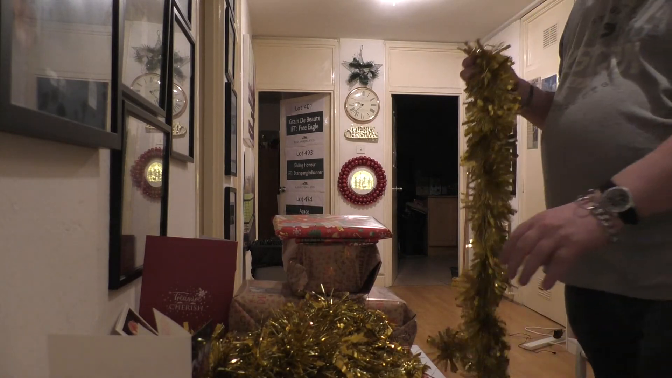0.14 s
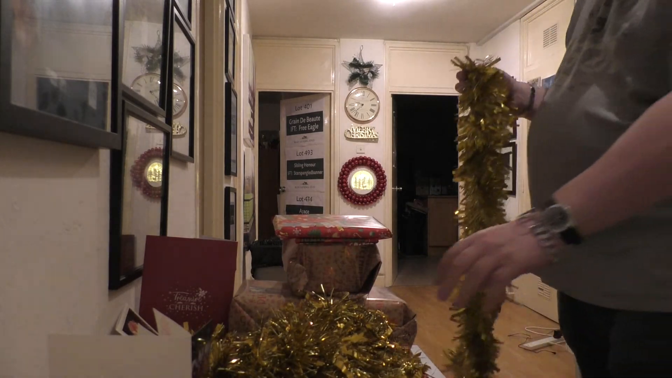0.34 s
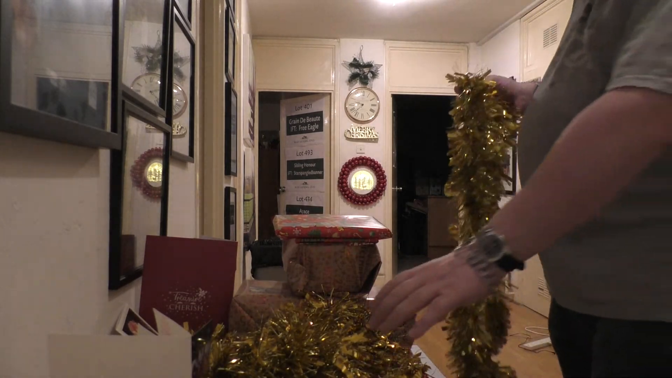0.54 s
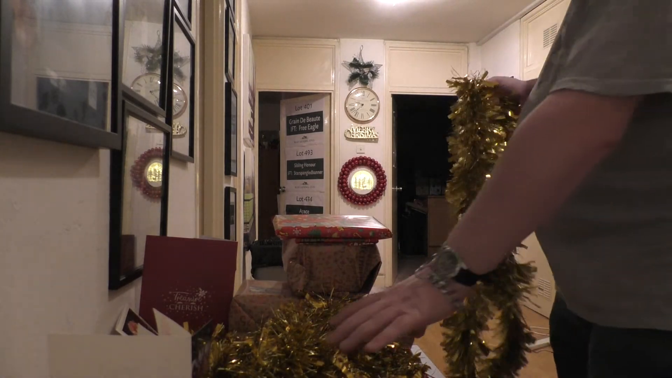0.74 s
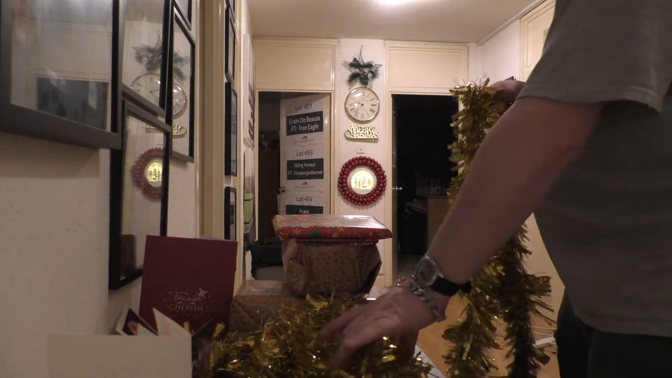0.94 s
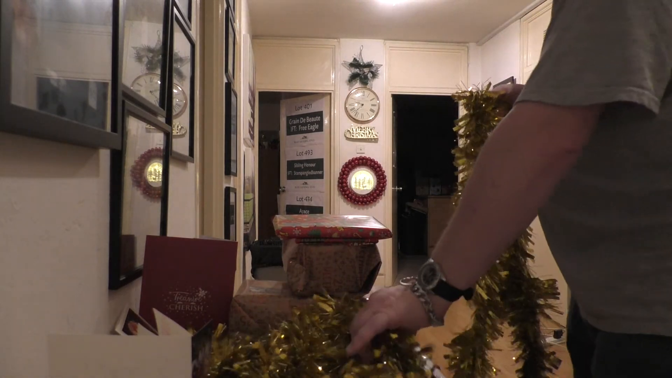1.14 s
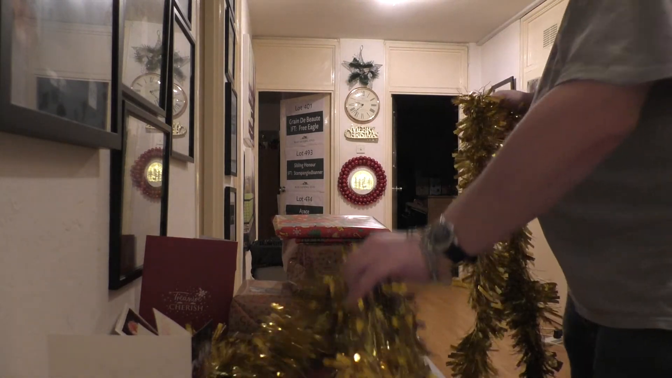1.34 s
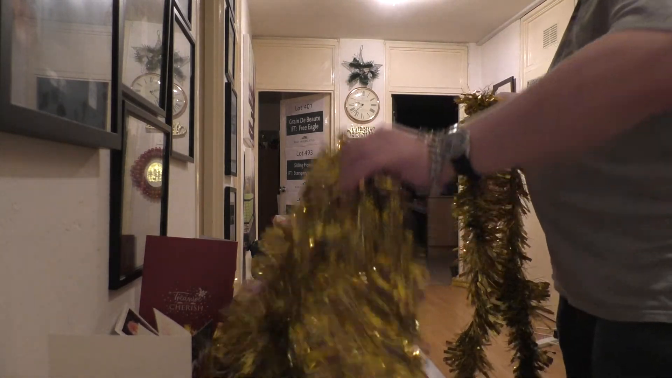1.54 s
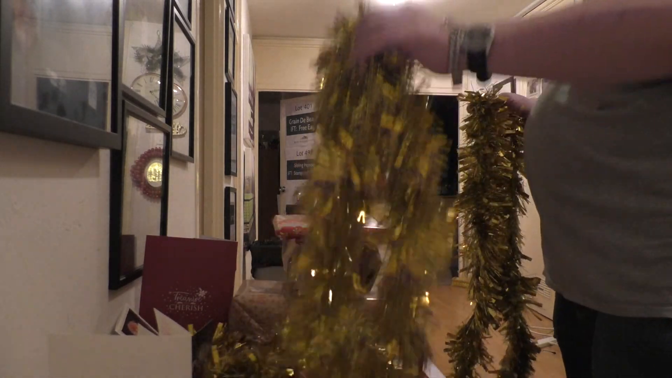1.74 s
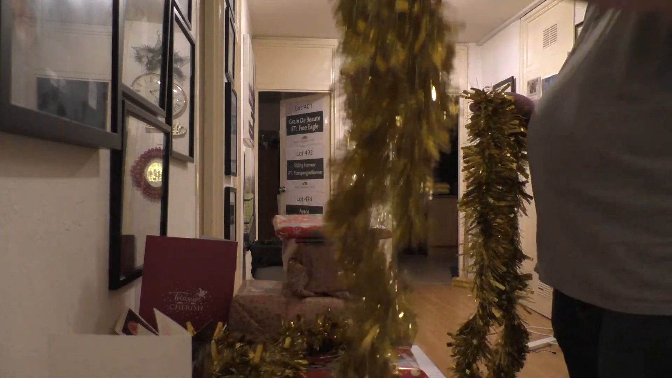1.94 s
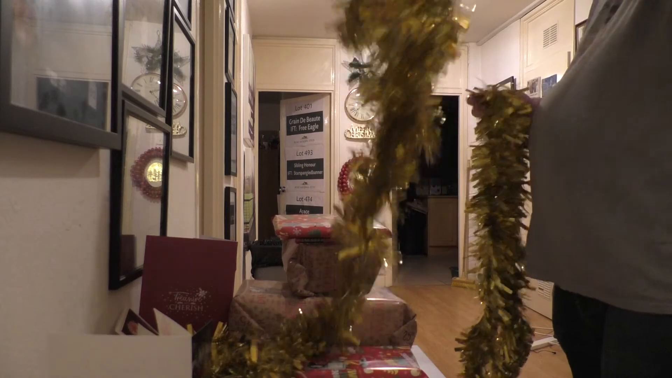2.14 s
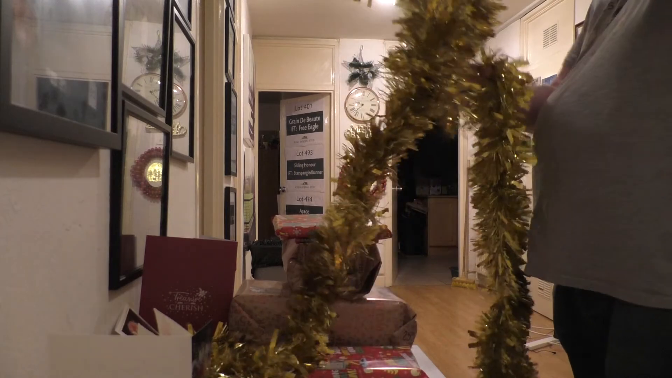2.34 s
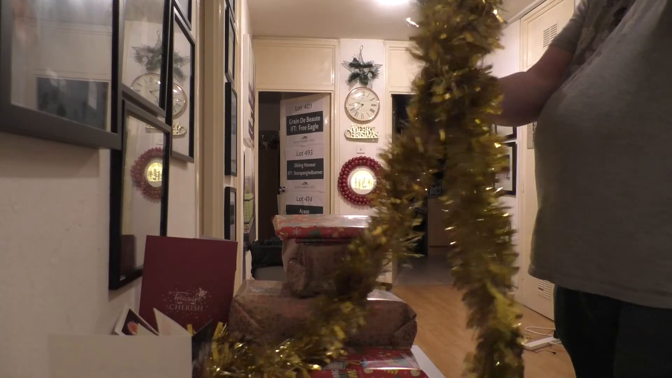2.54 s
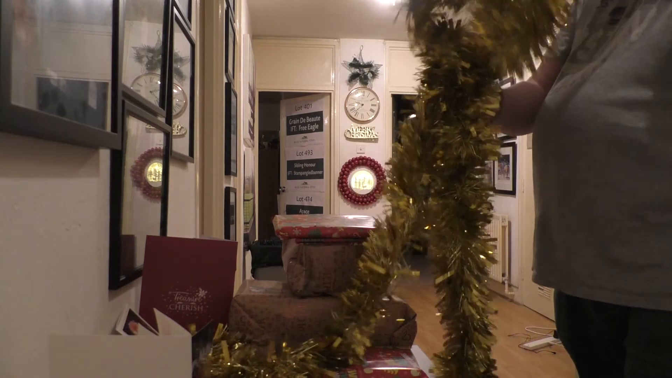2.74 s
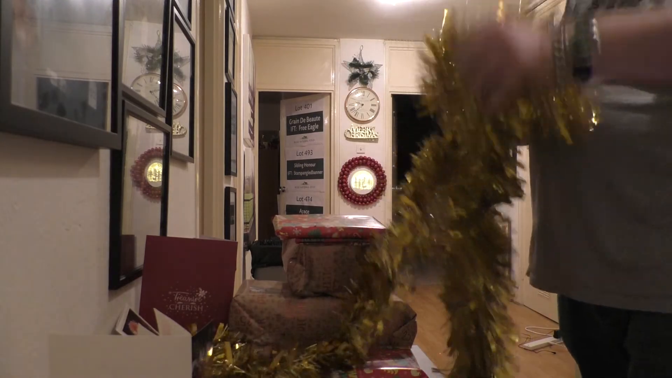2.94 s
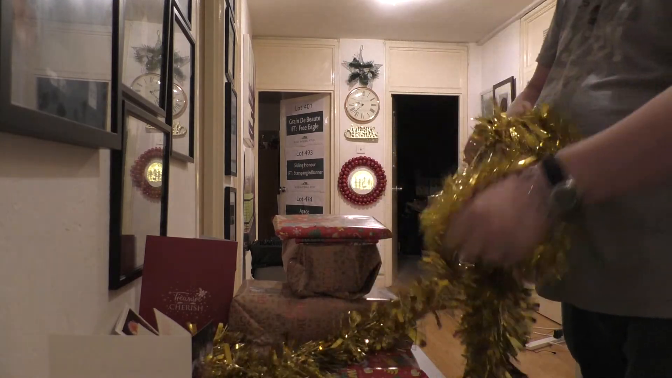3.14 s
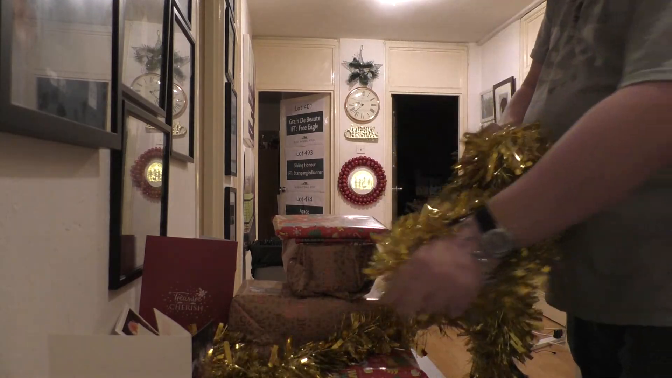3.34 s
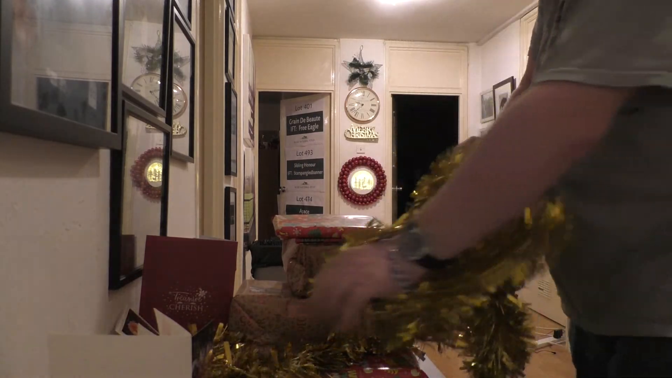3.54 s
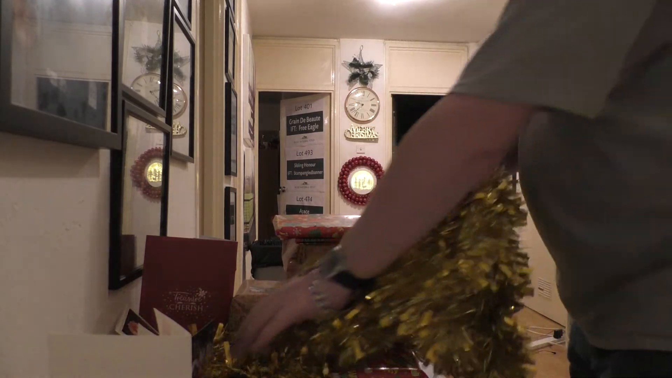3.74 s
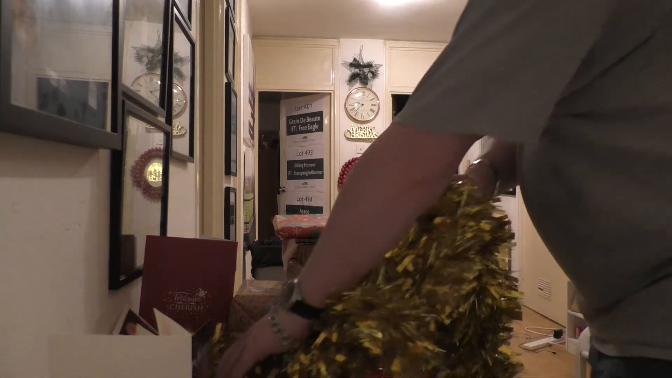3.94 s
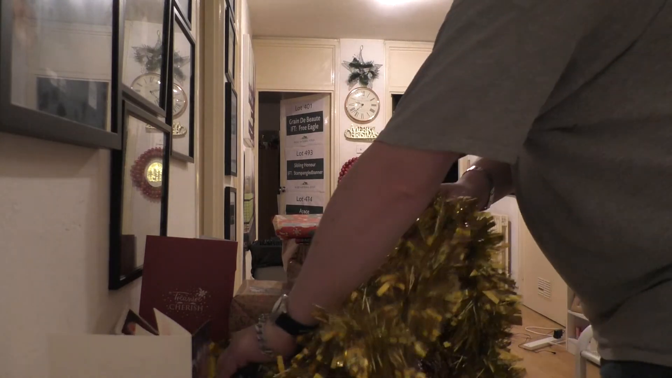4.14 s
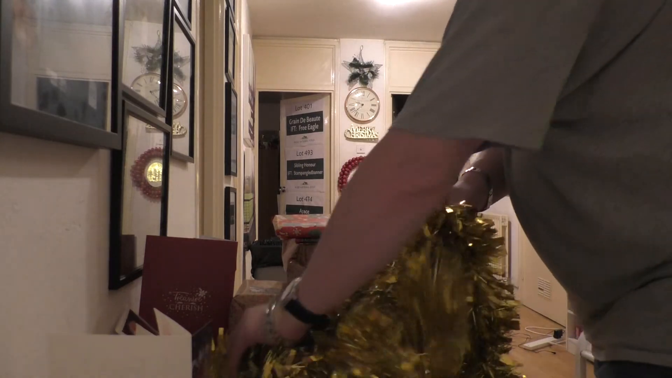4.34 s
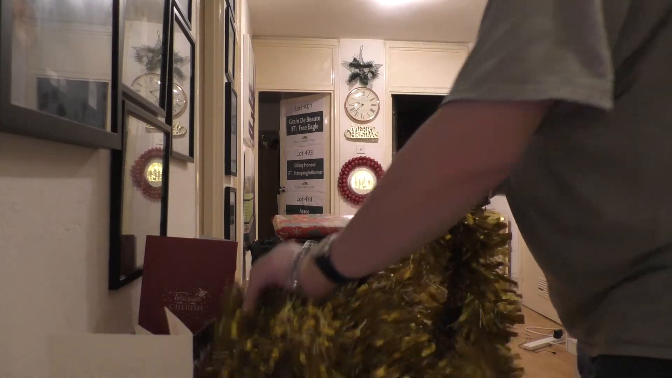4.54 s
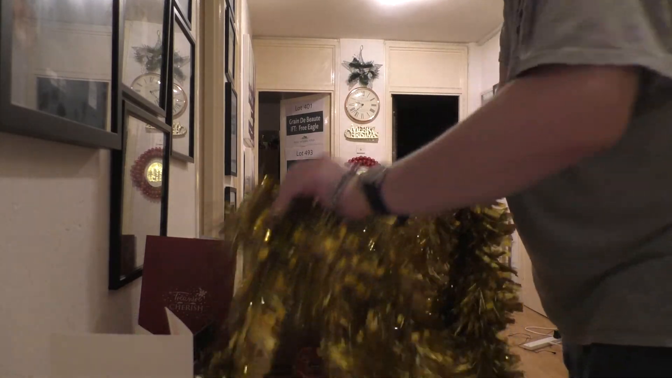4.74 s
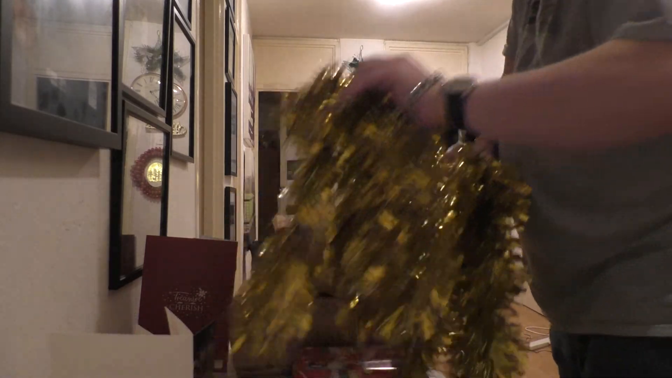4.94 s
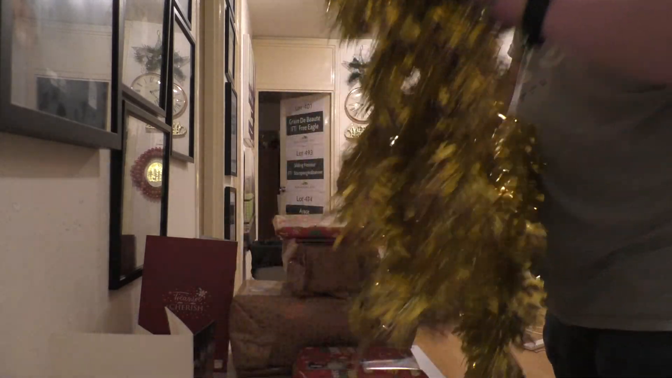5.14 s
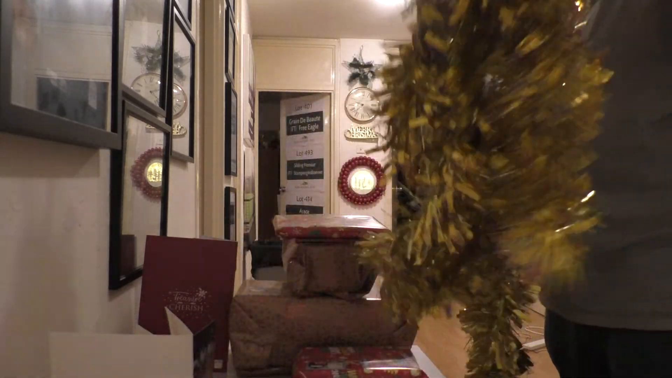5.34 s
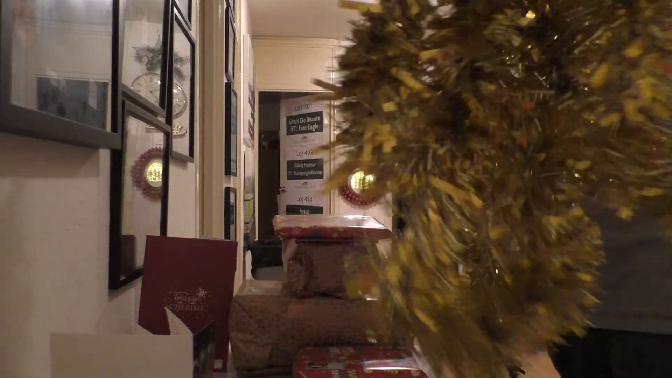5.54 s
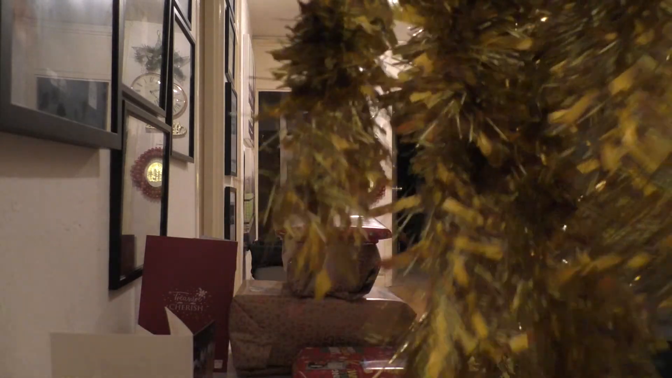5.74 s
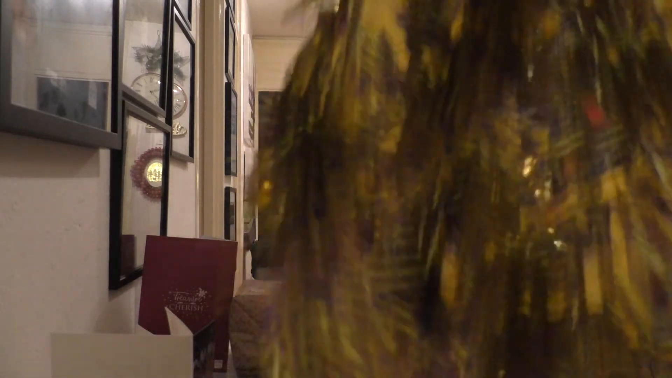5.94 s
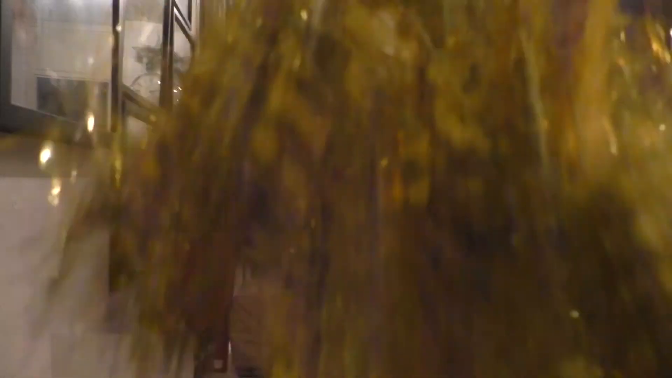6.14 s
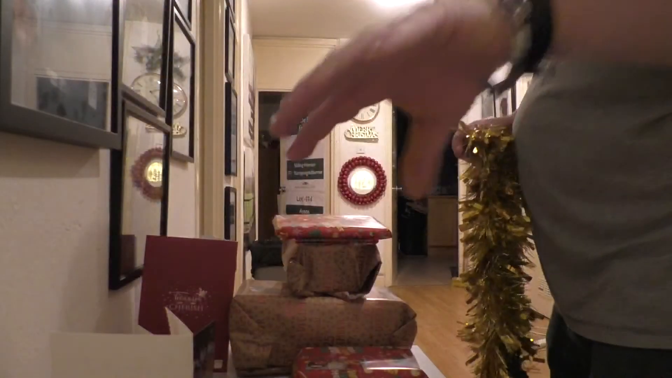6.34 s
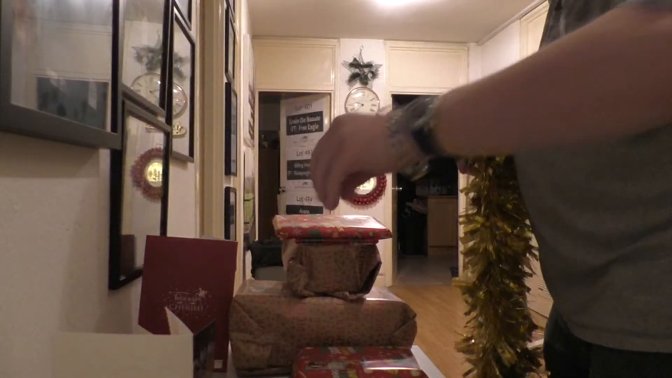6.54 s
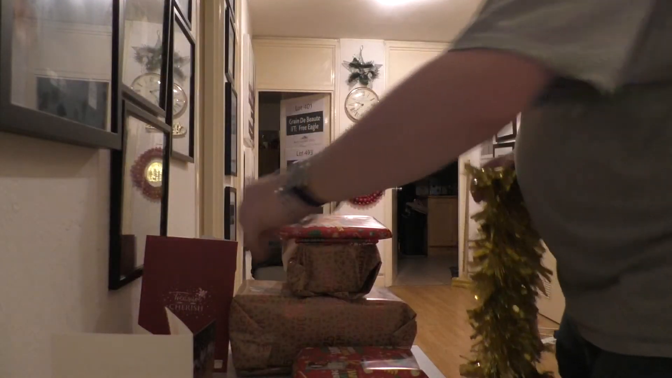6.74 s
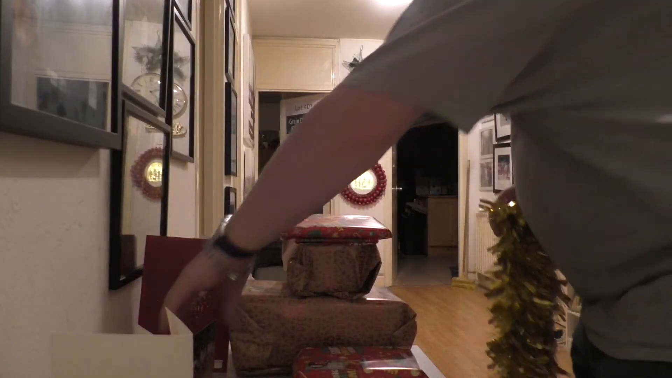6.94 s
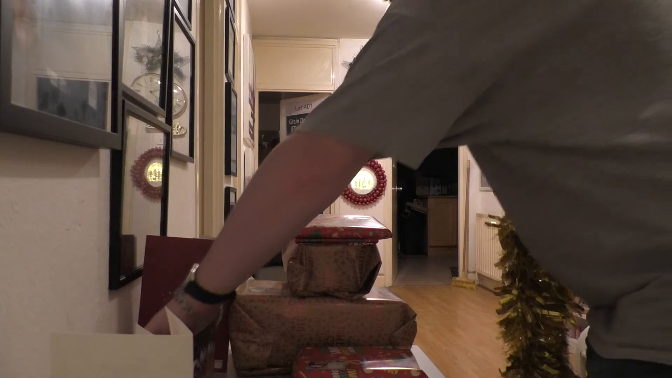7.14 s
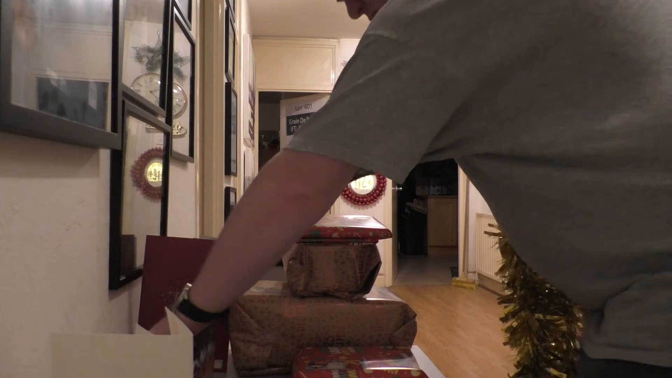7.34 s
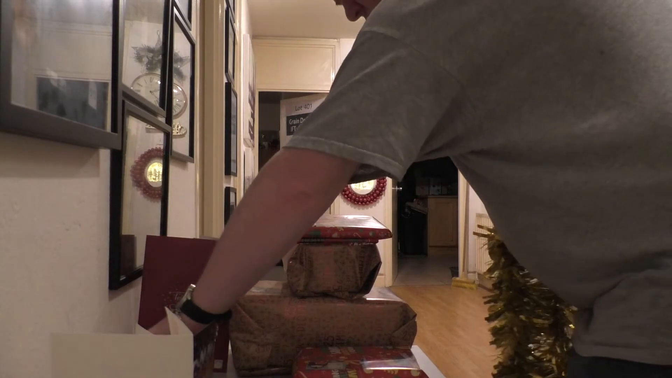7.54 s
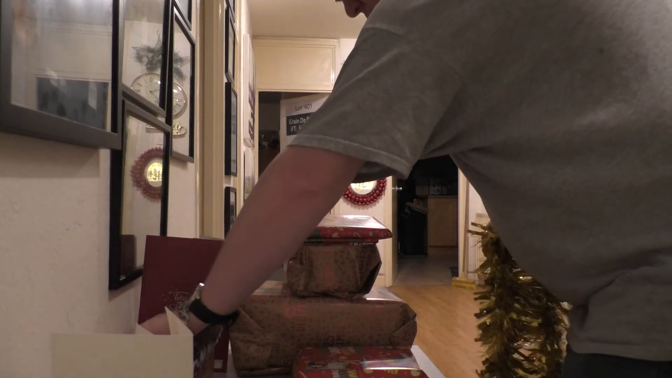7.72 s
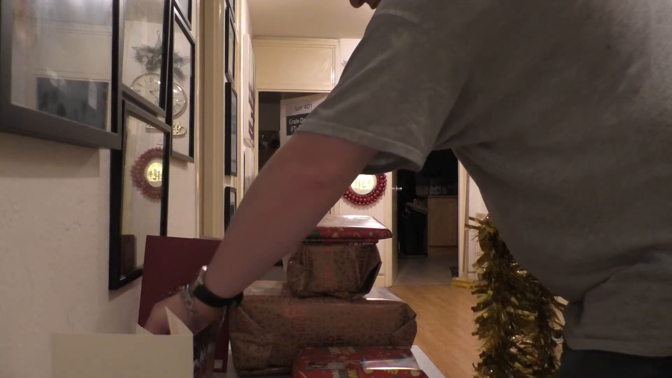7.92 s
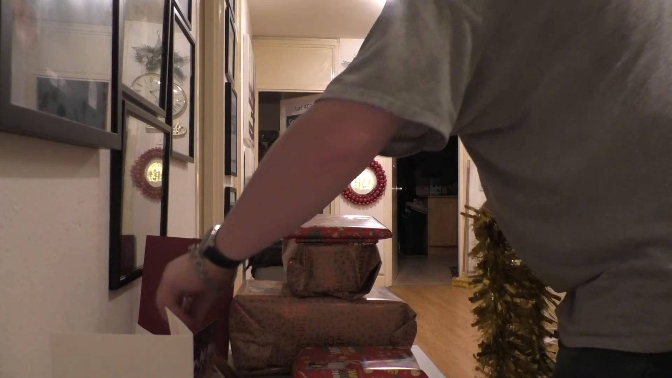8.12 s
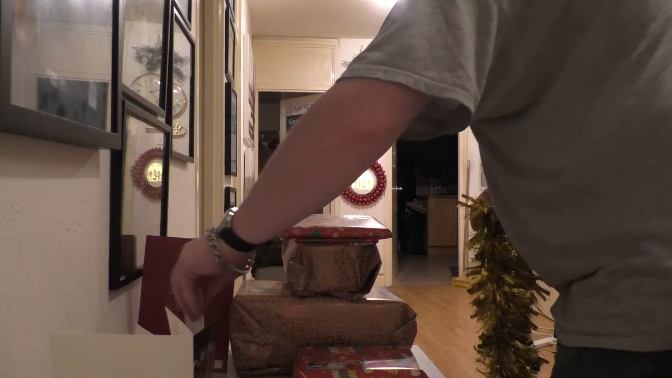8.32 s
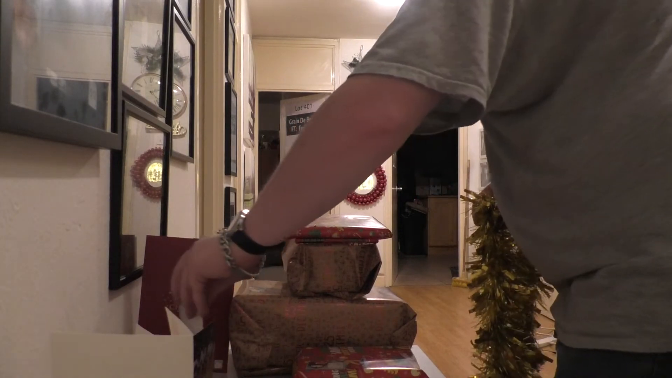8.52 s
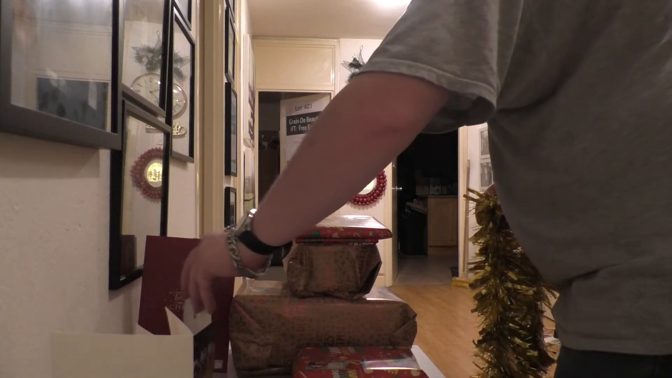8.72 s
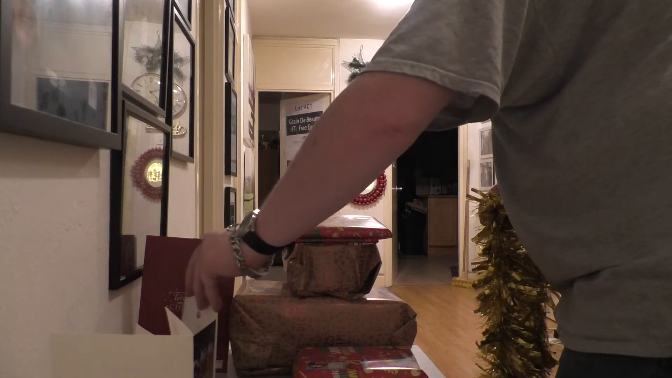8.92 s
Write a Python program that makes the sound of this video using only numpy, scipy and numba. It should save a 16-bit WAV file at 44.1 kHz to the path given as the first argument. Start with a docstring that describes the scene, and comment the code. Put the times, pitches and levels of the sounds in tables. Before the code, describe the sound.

Thin metallic tinsel crinkles beside a small stereo microphone indoors, first lightly, then more thickly as it is gathered and dragged over cardboard. Hollow box knocks and sharp foil snaps punctuate it, along with tiny high bracelet clinks. After a brief lull, one very close, harsh rush of crackling peaks and stops abruptly. Quiet fumbling and a cluster of soft knocks follow, with a short hall tail and low mains hum.

```python
"""A hallway at home: foil tinsel is lifted, gathered and dropped close to a small stereo microphone.
Showers of tiny contacts, filtered bright, make the ticking strips; darker grains scrape and rumble over
cardboard and wrapped boxes. Struck modes make a metal bracelet chink, the box knock under a hand and
creases snap, with a short hall tail. Mains hum and room air lie underneath."""
import sys
import numpy as np
from scipy import signal
from scipy.fft import rfft, irfft, next_fast_len
from scipy.io import wavfile
from scipy.ndimage import uniform_filter1d
from numba import njit

SR = 44100
rng = np.random.default_rng(int(sys.argv[2]) if len(sys.argv) > 2 else 0)


def master_out(mix):
    """Clip the mix to full scale and print it as 16-bit PCM to the path in sys.argv[1]."""
    frames = np.transpose(np.atleast_2d(mix))
    ceiling = np.clip(frames, -1, 1)
    pcm = np.round(ceiling * 32767).astype(np.int16)
    wavfile.write(sys.argv[1], SR, pcm)


N = 396018

# tone of the foil strips: f/Hz, level per Hz/dB
FOIL_TONE = [(1500, -41), (2500, -3.5), (4000, -3), (6000, -1.5), (8500, -2), (12000, -7.5), (16000, -18)]
# how hard the garland is moved, one curve per spell of handling: t/s, level of the foil strips/dB
HANDLING = [
    [(0.0, -55.5), (0.366, -61), (0.418, -52.5), (0.522, -52.5), (0.6, -61), (0.792, -65.5), (0.85, -62)],
    [(0.85, -63), (0.906, -63), (0.924, -56.5), (1.178, -44.5), (1.232, -52.5), (1.42, -45), (1.5, -47)],
    [(1.5, -47.5), (1.688, -43.5), (1.748, -48.5), (1.814, -56.5), (2.018, -65.5), (2.276, -53.5),
     (2.4, -59)],
    [(2.4, -56.5), (2.58, -46.5), (2.726, -53), (3.376, -51), (3.396, -52.5), (3.748, -53), (3.85, -53)],
    [(3.85, -55), (3.994, -50), (4.116, -51), (4.182, -44.5), (4.28, -49), (4.434, -46.5), (4.45, -48)],
    [(4.45, -46), (4.698, -46), (4.708, -43.5), (4.734, -48.5), (4.862, -51), (4.902, -47), (4.98, -50)],
    [(5.02, -45.5), (5.034, -50), (5.262, -51), (5.268, -48.5), (5.394, -52.5), (5.49, -62.5), (5.97, -60)],
    [(5.97, -60), (6.014, -48.5), (6.08, -47.5), (6.104, -43), (6.3, -36.5)],
    [(6.3, -35), (6.316, -30.5), (6.322, -33), (6.636, -61), (6.862, -61.5), (6.9, -63.5)],
    [(7.4, -65.5), (7.484, -68), (7.528, -64), (7.618, -71), (7.67, -64), (7.814, -51.5), (8.0, -69)],
    [(8.0, -72), (8.092, -61), (8.222, -51), (8.338, -75), (8.906, -86), (8.924, -54), (8.98, -80)],
]
# side level for all layers but the hum, with a gap near 7 kHz, before any trim: f/Hz, side re mid/dB
SIDE_LEVEL = [(60, -6), (110, -6.5), (200, -5.5), (500, -7), (1000, -7), (2400, -7), (4000, -6), (5500, -6),
              (7000, -48), (8500, -12), (11000, -8.5), (15000, -6.5)]


def undb(db):
    """Level in dB to amplitude."""
    return 10 ** (np.asarray(db) / 20)


def colour(x, table, sign=1):
    """Equalise by a table of f/Hz and level/dB, joined on a log frequency axis; sign scales the dB."""
    hz, db = np.transpose(table)
    size = next_fast_len(N)
    bin_hz = np.maximum(np.arange(size // 2 + 1) * SR / size, 1)
    gain = undb(sign * np.interp(np.log(bin_hz), np.log(hz), db))
    return irfft(rfft(x, size) * gain, size)[..., :N]


def unit(x, lo_hz, hi_hz):
    """Scale all channels so that the band lo-hi of the first has rms 1."""
    sos = signal.butter(4, [lo_hz, hi_hz], "band", fs=SR, output="sos")
    band = signal.sosfilt(sos, x)
    return x / np.sqrt(np.mean(band[0] ** 2))


def walk(rate):
    """Random drift: new values 'rate' times a second, joined and smoothed."""
    knots = rng.standard_normal(size=N // 256)
    joined = np.interp(np.arange(N) * rate / SR, np.arange(len(knots)), knots)
    return uniform_filter1d(joined, int(SR / rate / 2))


def curve(table):
    """Columns of a time table, one value per sample."""
    s, *columns = np.vstack(table).T
    return [np.interp(np.arange(N) / SR, s, column) for column in columns]


def grains(rate, spread_db, patchy_db, patch_rate):
    """Mid and side of a shower of tiny contacts; a few are much bigger, and they come in patches."""
    hit = rng.random((2, N)) < rate / SR
    size = undb(spread_db * rng.exponential(size=(2, N))) * rng.standard_normal((2, N))
    return hit * size * undb(patchy_db * walk(patch_rate))


def ring(push, hz, t60):
    """One decaying mode with a unit answer to a unit push."""
    r = np.exp(-np.log(1000) / (t60 * SR))
    w = 2 * np.pi * hz / SR
    return signal.lfilter([0, np.sin(w)], [1, -2 * r * np.cos(w), r * r], push)


def strike(times, db, modes, scatter_db):
    """Blows ring modes (f/Hz, t60/s) at db[blow, mode]; shares and signs are drawn at random for each blow."""
    luck = rng.standard_normal((len(times), len(modes), 2))
    gain = undb(db + scatter_db * luck[..., 0]) * np.sign(luck[..., 1])
    push = np.zeros((len(modes), N))
    push[:, (times * SR).astype(int)] = gain.T
    return sum(ring(p, *mode) for p, mode in zip(push, modes))


def background():
    """Room air and microphone hiss as coloured noise, and a hum at twice the mains rate."""
    # tone of air and hiss: f/Hz, level per Hz/dB
    air_tone = [(22, -11), (31, 0.5), (42, -6), (80, -6.5), (125, -4.5), (300, -6), (420, -13), (630, -22),
                (1200, -12), (2000, -15), (4800, -22.5), (12500, -23), (16000, -28)]
    air_db, hum_hz, hum_db = -56, 100.6, -59
    noise = unit(colour(rng.standard_normal((2, N)), air_tone), 120, 16000)
    mid, side = noise * undb(air_db + 0.6 * walk(2.4))
    hum_level = np.sqrt(2) * undb(hum_db + 2.1 * walk(7.6))
    hum_phase = 2 * np.pi * hum_hz * np.arange(N) / SR + 0.39 * walk(3.35)
    hum = hum_level * np.sin(hum_phase)
    return np.array([mid + hum, colour(side, SIDE_LEVEL) + undb(-23.5) * hum])


@njit
def hollow(x, hz, width):
    """Band-pass whose centre moves: a state-variable resonator, width in Hz."""
    y, band, low = np.empty(len(x)), 0., 0.
    for i in range(len(x)):
        g, k = np.tan(np.pi * hz[i] / SR), width / hz[i]
        v = (band + g * (x[i] - low)) / (1 + g * (g + k))
        band, low, y[i] = 2 * v - band, low + 2 * g * v, k * v
    return y


def flutter(lo_hz, hi_hz, t60, swell_db, count):
    """Creases of many sizes ring briefly at their own pitches, each coming and going."""
    pitches = np.geomspace(lo_hz, hi_hz, count) * (1 + 0.036 * rng.standard_normal(count))
    return sum(ring(grains(900, 1.15, swell_db, 9), hz, t60) for hz in pitches)


def tinsel():
    """Strips tick in the treble, the bunch scrapes in the middle and shakes the box below."""
    # tones of the thinnest strips, the scraping and the box rumble: f/Hz, level per Hz/dB
    thin_tone = [(6000, -23), (8000, -5.5), (11000, -2), (15000, -6.5), (16000, -10)]
    scrape_tone = [(500, -16), (900, -9), (1400, -4.5), (1900, -2.5), (2600, -5.5), (3600, -3.5),
                   (5000, -9.5), (7000, -35)]
    rumble_tone = [(80, -43.5), (115, 1), (140, -1), (260, -2.5), (420, -3.5), (600, -12.5), (900, -25.5),
                   (1500, -27)]
    # held in the air the thinnest strips stand out, dragged over the boxes the bunch scrapes and rumbles:
    # t/s, then re foil strips: thinnest strips/dB, scraping before hollow and creases/dB, box rumble/dB
    contact = [(0, 0.5, -3.5, -15), (.35, 1, -0.5, -9), (.56, -9, -0.5, -2.5), (.8, 1, 6, -6),
               (1.0, 1, 1.5, -2), (1.45, -1.5, -1.5, -9), (1.7, 0.5, 0.5, -6.5), (2.2, 4, 2.5, -6.5),
               (2.6, 1.5, -2.5, -13), (3.5, 1.5, -1, -10), (4.1, 1, 1.5, -4), (4.25, -0.5, 4.5, -4.5),
               (4.4, 1, -3.5, -6.5), (4.58, 0.5, 2, 4), (4.68, -0.5, -1.5, -10), (4.74, -1.5, 3, 8),
               (4.86, 1, 2, -7.5), (5.1, 0.5, -2.5, -6), (5.45, 5, -3.5, -13), (5.95, -0.5, 0, -14),
               (6.2, 5, 4.5, -7), (6.35, -1.5, -1, -11.5), (6.8, 3, 5.5, 0.5), (7.45, -5, 8, 7),
               (7.75, -1, -1.5, -3.5), (8.05, -20, 8.5, 3), (8.25, -3, 6.5, -10), (8.6, -8, 3, 14),
               (8.98, -9, 5.5, 5)]
    (foil_db,) = curve(HANDLING)
    thin_db, scrape_db, rumble_db = curve(contact)

    foil = unit(colour(grains(12000, 0.33, 1.0, 30), FOIL_TONE), 4540, 6990)
    thin = unit(colour(grains(12000, 0.92, 1.0, 30), thin_tone), 9100, 11620)
    rub = unit(colour(grains(5000, 0.61, 2.0, 25), scrape_tone), 760, 5900)

    # the air pocket under the bunch: centre wanders, level flickers re scraping
    hollow_hz = 2260 * (1 + 0.12 * walk(5))
    hollow_db = -11 + 3.5 * walk(8)
    pocket = np.array([hollow(channel, hollow_hz, 260.0) for channel in rub])
    creases = unit(flutter(1273, 4237, 0.022, 2.9, count=10), 930, 4760)
    scrape = rub + undb(hollow_db) * unit(pocket, 1200, 3900) + undb(-3.5) * creases

    rumble = unit(colour(grains(1200, 1.2, 3.5, 16), rumble_tone), 90, 910)
    bunch = foil + undb(thin_db) * thin + undb(scrape_db) * scrape + undb(rumble_db) * rumble
    mid, side = undb(foil_db) * bunch
    return np.array([mid, colour(side, SIDE_LEVEL)])


def box():
    """A blow rings modes near its thud and wall pitches and booms in the surface; moving foil crackles."""
    # knocks, before the mode levels:
    # t/s, thud/dB, thud centre f/Hz, wall re thud/dB, wall centre f/Hz, boom re thud/dB
    knock_table = [(0.387, -50, 218, -12, 1820, -10), (0.738, -52.5, 365, -9, 1730, -20),
                   (1.136, -41, 300, -14, 2400, -12), (1.15, -42, 260, -14, 2000, -7),
                   (1.644, -41, 234, -7.5, 1850, -25), (1.673, -42.5, 203, -7, 3100, 5),
                   (3.518, -51, 396, -5, 3070, -11), (3.893, -47.5, 318, -9, 1370, -13),
                   (3.935, -46.5, 350, -21, 2480, -15), (4.152, -42, 283, 1.5, 1510, -16),
                   (4.159, -38, 290, 3.5, 1710, -18), (4.181, -43, 280, 3, 1540, -5),
                   (4.599, -44, 358, -2, 2440, -6), (4.702, -32.5, 360, -12, 2970, -17),
                   (4.718, -37.5, 248, -16, 1390, -3), (6.004, -47.5, 302, -1, 1800, -15),
                   (6.107, -43, 332, -5, 1690, -10), (6.245, -41.5, 266, -8, 2920, -23),
                   (6.82, -56.5, 293, -2, 982, -8), (7.382, -56, 415, -15, 2330, -14),
                   (7.802, -43, 296, -5.5, 2380, -12), (8.342, -37.5, 264, -8.5, 1110, -23),
                   (8.353, -38, 270, -14, 1110, -10), (8.384, -48, 304, -9, 1200, -2),
                   (8.439, -44, 278, -11, 1170, -17), (8.465, -42.5, 266, -8, 1130, -8),
                   (8.489, -47.5, 221, -7, 961, -8), (8.92, -50.5, 277, -12, 2090, -10)]
    # modes of the cardboard box: f/Hz, level/dB, t60/s
    box_modes = [(196, -2.5, 0.13), (273, 0, 0.15), (328, -2.5, 0.097), (407, -8.5, 0.053),
                 (426.5, -1.5, 0.15), (485, 0, 0.11), (543, -1, 0.06), (638, 2.5, 0.044), (731, 3, 0.089),
                 (895, 2, 0.065), (990, 4.5, 0.085), (1110, -0.5, 0.091), (1173, 6.5, 0.073),
                 (1270, 1, 0.046), (1425, 4, 0.036), (1563, 6, 0.078), (1650, 2, 0.11), (1800, 0, 0.081),
                 (1920, 0, 0.047), (2060, 0, 0.042), (2300, 6, 0.035), (2480, 5, 0.076), (2790, 1, 0.055),
                 (2800, 4, 0.042), (3100, 2, 0.066), (3200, 11, 0.043), (3620, -3, .04)]
    # modes of the surface under the box: f/Hz, t60/s
    surface_modes = [(132, 0.79), (165, 0.52)]
    jolt_db, jolt_s = 1.5, 0.012  # flare of the foil re foil strips, decay time constant

    s, db, thud_hz, wall_db, wall_hz, boom_db = np.transpose(knock_table)[..., None]
    times = s[:, 0]
    modes = np.array(box_modes)
    octave = np.log2(modes[:, 0])
    # modes drop off with the square of their distance in octaves
    thud = undb(db - 9.6 * (octave - np.log2(thud_hz)) ** 2)
    wall = undb(db + wall_db - 10.0 * (octave - np.log2(wall_hz)) ** 2)
    mode_db = 20 * np.log10(thud + wall) + modes[:, 1]
    knock = strike(times, mode_db, modes[:, ::2], 0.81)
    knock = knock + strike(times, db + boom_db - [0, 4], surface_modes, 1.4)
    # high-pass: little deep bass in the knocks
    knock = signal.sosfilt(signal.butter(4, 105, "high", fs=SR, output="sos"), knock)

    t = np.arange(N) / SR
    jolt = sum(np.exp(-np.maximum(t - t0, 0) / jolt_s) * (t > t0) for t0 in times)
    crackle = unit(colour(rng.standard_normal((1, N)), FOIL_TONE), 3950, 8000)[0]
    return knock + jolt * undb(curve(HANDLING)[0] + jolt_db) * crackle


def snaps():
    """A crease pops: a short ring at its own pitch and an equally strong bright tick."""
    # single foil snaps: t/s, level of ring and of tick/dB, pitch f/Hz
    snap_table = [(1.0864, -35, 2060), (1.4094, -33, 1890), (1.5064, -37.5, 2750), (2.5088, -37.5, 1635),
                  (4.6094, -36.5, 2240), (4.7015, -25.5, 3000), (4.807, -33.5, 1540), (4.9406, -37, 1370),
                  (4.9604, -32, 1910), (4.9907, -27.5, 1450), (5.995, -37, 1500), (6.028, -32, 1800),
                  (6.0695, -34, 1380), (6.099, -26, 1790), (6.133, -25, 2030), (6.168, -19.5, 1800),
                  (6.1983, -23, 2650), (6.271, -22.5, 1930), (6.3129, -20.5, 2630), (6.3452, -33, 3100),
                  (6.374, -25, 2400), (7.66, -47, 3070), (7.802, -32, 2230), (8.216, -34, 1680),
                  (8.76, -46.5, 2170)]
    out = np.zeros(N)
    push = np.arange(SR // 20) == 0
    for s, db, hz in snap_table:
        pop = ring(push, hz, 0.029) + ring(push, 5500, 0.0019)
        out[int(s * SR):][:len(push)] += undb(db) * pop
    return out


def bracelet():
    """Small links strike each other and ring; each contact favours other links."""
    # chinks: t/s, main link/dB, then re main: low link/dB, middle link/dB, top link/dB, tick/dB
    chink_table = [(2.928, -22.5, -18, -11, -22, 1), (2.938, -25, -16, -12, -22, -14),
                   (2.944, -28, -6, -5, -22, -14), (2.952, -26, -7, -7, -20, -14),
                   (5.269, -39, -8, -10, 0, 24), (5.275, -25, -13, -14, -18, -14),
                   (5.279, -21, -19, -18, -18, -10), (5.312, -37, 6, -4, -10, 4),
                   (5.319, -22.5, -12, -13, -7, 10), (5.327, -42, 5, -12, 3, -10),
                   (5.3518, -25.5, -16, -19, -16, -6), (5.374, -30, -9, -16, -16, -3),
                   (5.382, -15.5, -9, -20, -22, -12), (5.397, -34, -8, -14, -16, -12),
                   (5.426, -43, -11, -2, -16, -14), (6.795, -51, -12, -12, 8, 4),
                   (7.676, -40, -20, -7, -8, 14)]
    # modes of the main, low, middle, high and top links and of the tick of contact: f/Hz, level/dB, t60/s
    link_modes = [
        [(11580, -11, .04), (11790, 0, .032), (11770, -15, .17)],
        [(3230, -14, .03), (7385, 0, .06), (7600, -6, .1)],
        [(9090, -2, .09)],
        [(13100, 0, .045)],
        [(13750, 0, .04)],
        [(12500, 0, .0015), (8000, -5, .0015)],
    ]
    s, main_db, low_db, middle_db, top_db, tick_db = np.transpose(chink_table)
    high_db = -12.5
    out = np.zeros(N)
    for share_db, modes in zip([0, low_db, middle_db, high_db, top_db, tick_db], link_modes):
        modes = np.array(modes)
        out += strike(s, (main_db + share_db)[:, None] + modes[:, 1], modes[:, ::2], 0.57)
    return out


def hall(x):
    """Add a short diffuse tail of decaying noise, unrelated in mid and side."""
    t60_s, tail_db, side_trim_db = 0.27, -9, 2.5
    t = np.arange(SR // 2) / SR
    decay = np.exp(-np.log(1000) * t / t60_s) * (t > .004)  # silent for the first 4 ms
    tail = rng.standard_normal((2, len(t))) * decay
    tail = tail / np.sqrt(np.sum(tail[0] ** 2))
    wet = signal.fftconvolve(x[None], tail, axes=1)[:, :N] * undb(tail_db)
    return np.array([x + wet[0], colour(wet[1], SIDE_LEVEL) * undb(side_trim_db)])


def scene():
    """Sum the layers as mid and side, then turn them into left and right."""
    mid, side = tinsel() + hall(bracelet() + box() + snaps()) + background()
    return np.array([mid + side, mid - side])


def record(dry):
    """The left microphone port takes more bass; the top is cut at 15.8 kHz."""
    # bass tilt, scaled up on the left and down on the right: f/Hz, level before scaling/dB
    bass_tilt = [(30, 1.5), (300, 2), (600, 0)]
    left = colour(dry[0], bass_tilt, sign=0.35)
    right = colour(dry[1], bass_tilt, sign=-0.47)
    top_cut = signal.ellip(12, .2, 95, 15800, fs=SR, output="sos")
    return signal.sosfilt(top_cut, np.array([left, right]))


dry = scene()
out = record(dry)
master_out(out)
```